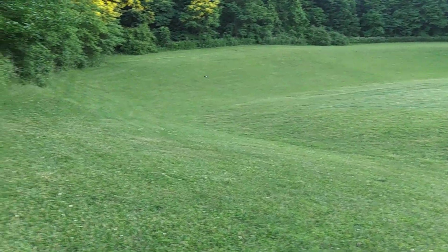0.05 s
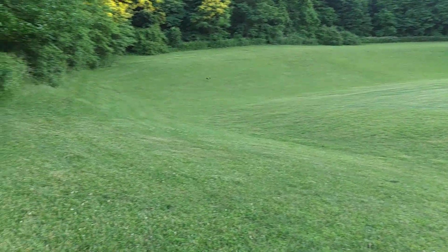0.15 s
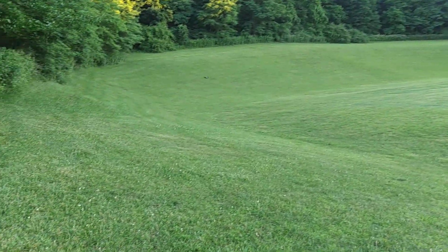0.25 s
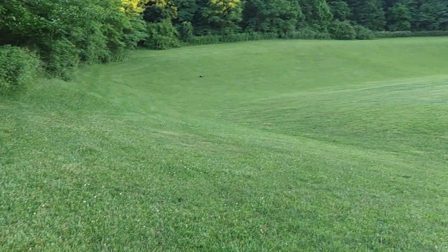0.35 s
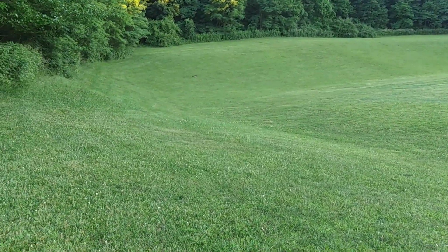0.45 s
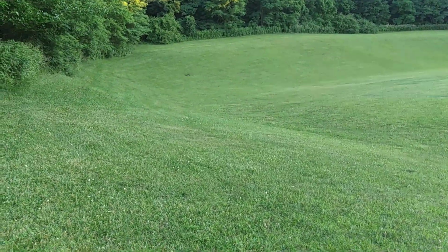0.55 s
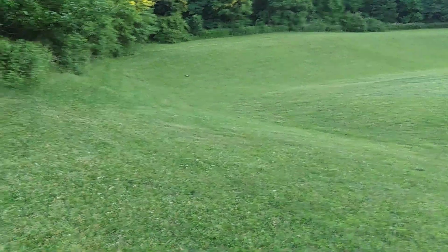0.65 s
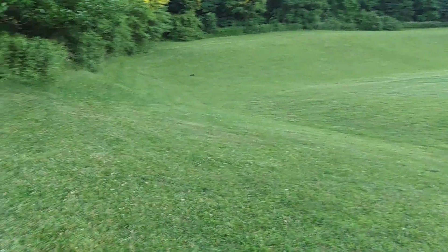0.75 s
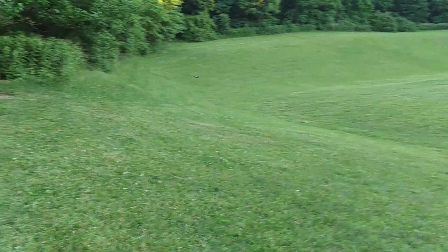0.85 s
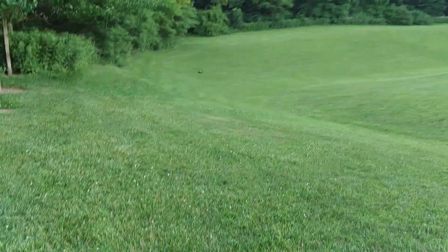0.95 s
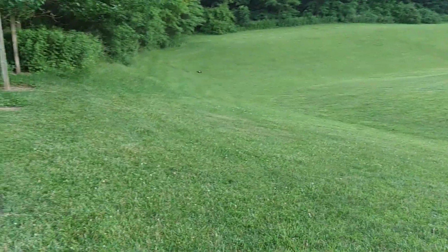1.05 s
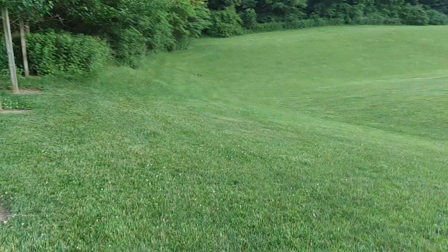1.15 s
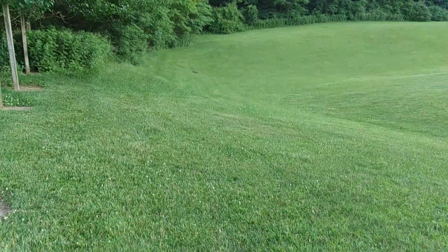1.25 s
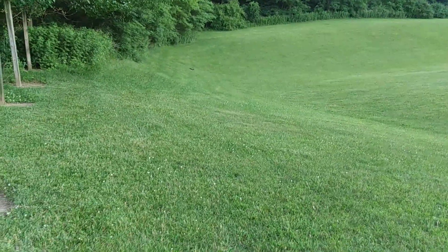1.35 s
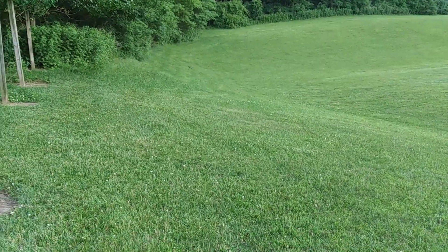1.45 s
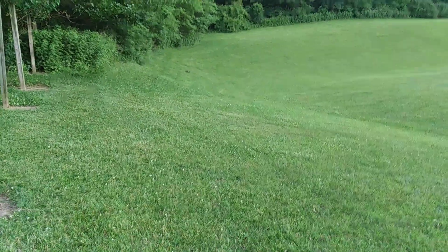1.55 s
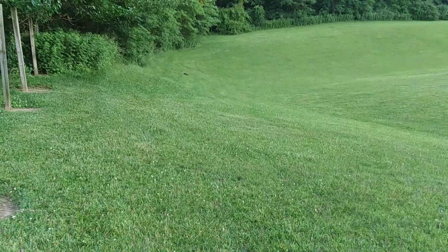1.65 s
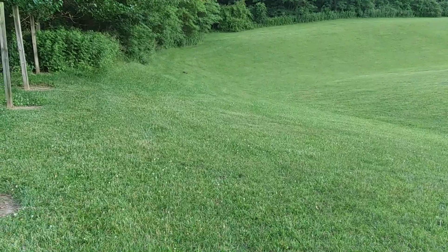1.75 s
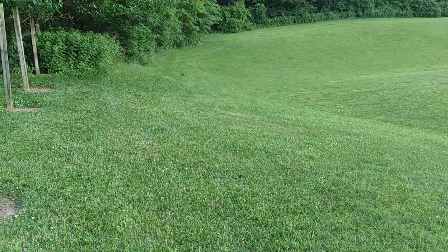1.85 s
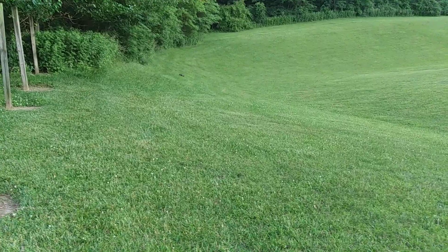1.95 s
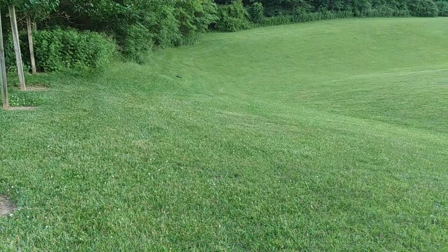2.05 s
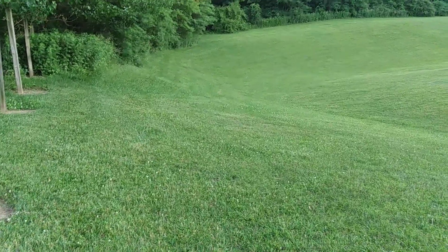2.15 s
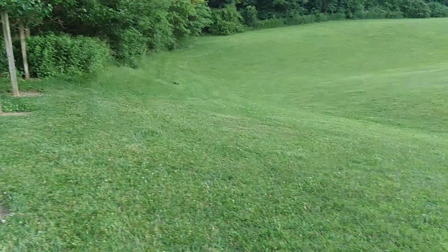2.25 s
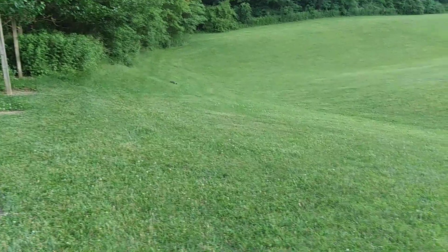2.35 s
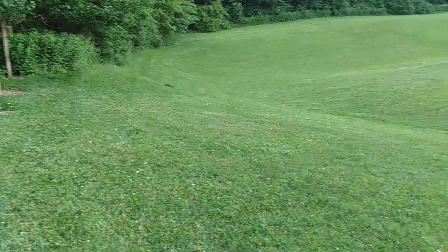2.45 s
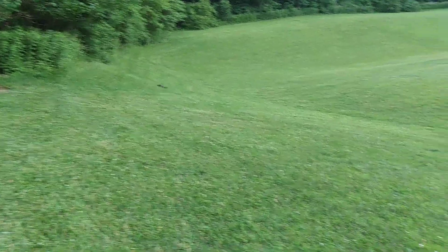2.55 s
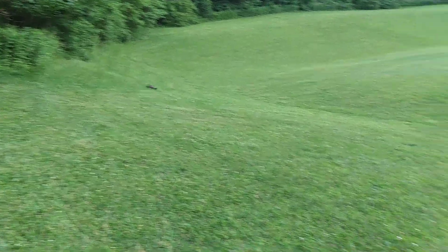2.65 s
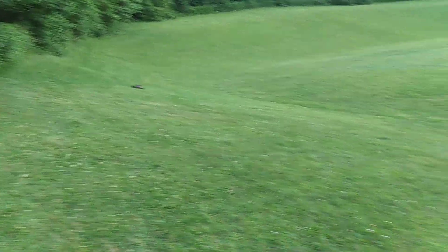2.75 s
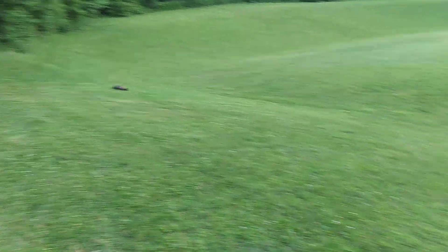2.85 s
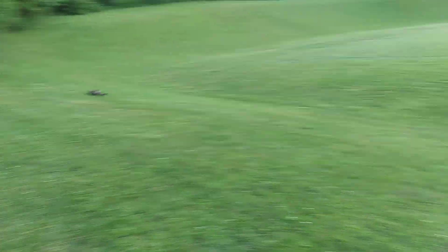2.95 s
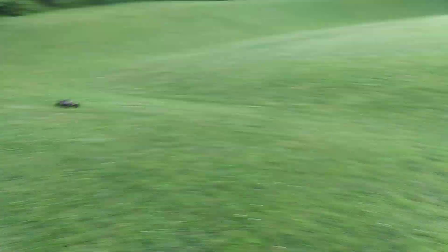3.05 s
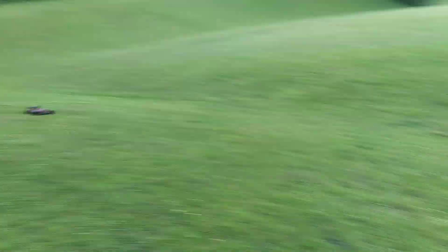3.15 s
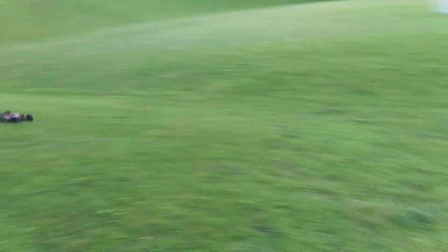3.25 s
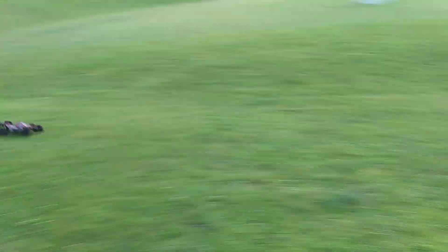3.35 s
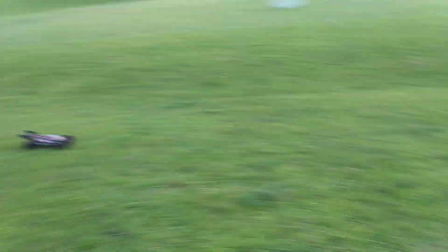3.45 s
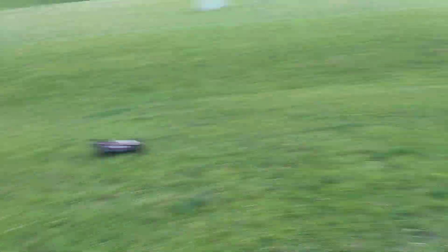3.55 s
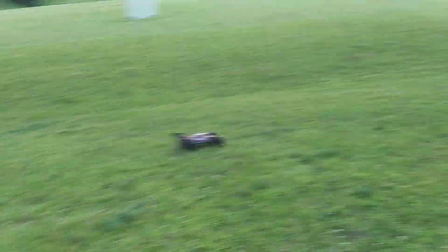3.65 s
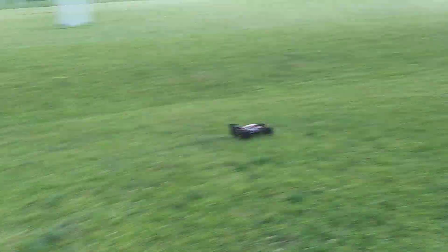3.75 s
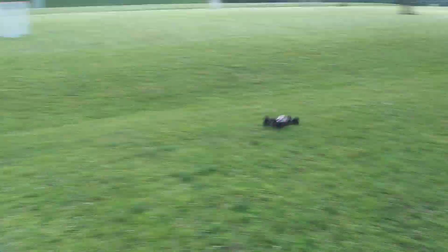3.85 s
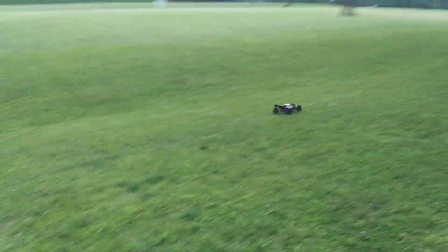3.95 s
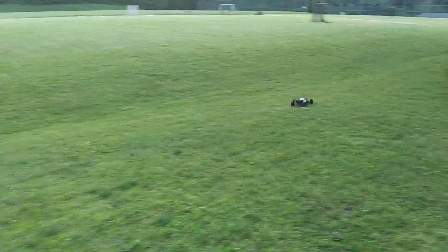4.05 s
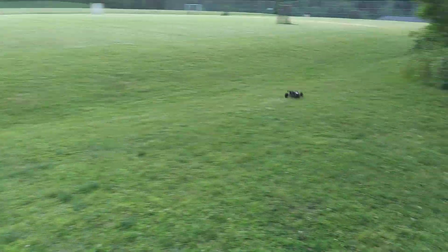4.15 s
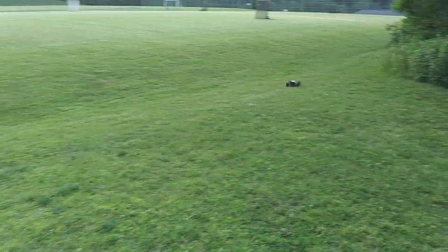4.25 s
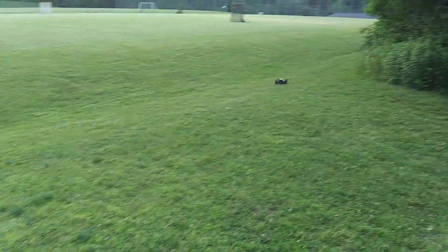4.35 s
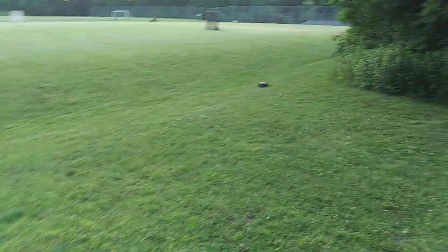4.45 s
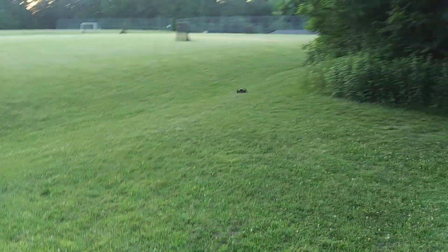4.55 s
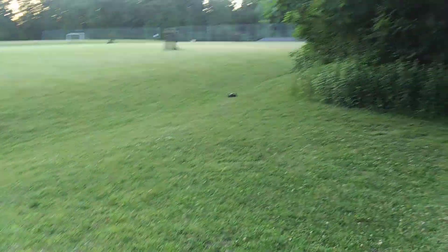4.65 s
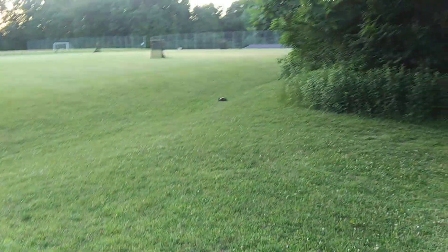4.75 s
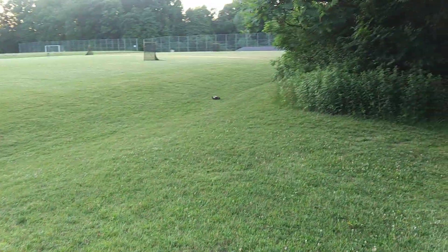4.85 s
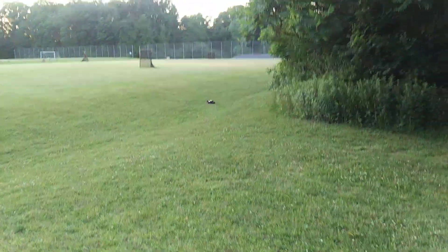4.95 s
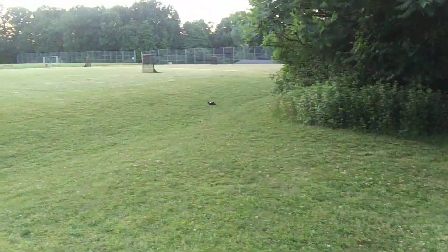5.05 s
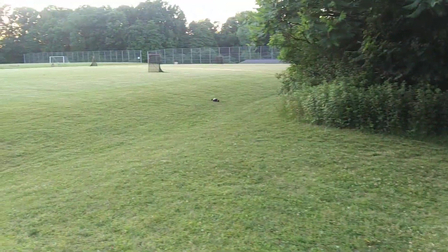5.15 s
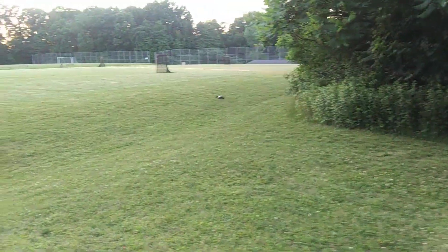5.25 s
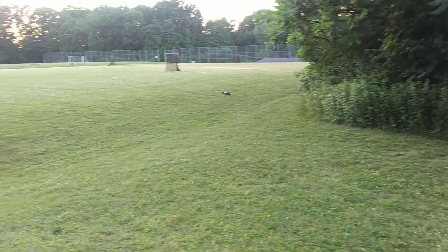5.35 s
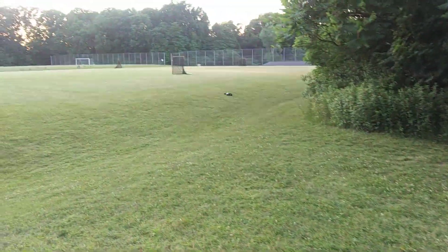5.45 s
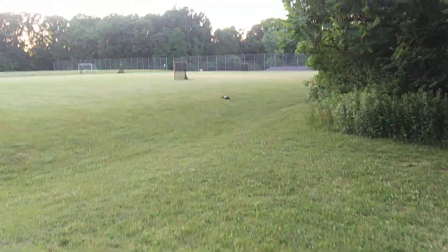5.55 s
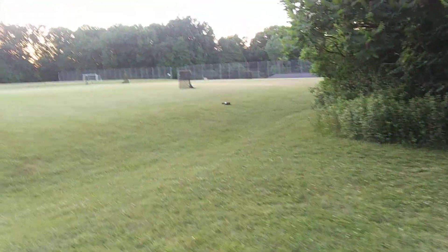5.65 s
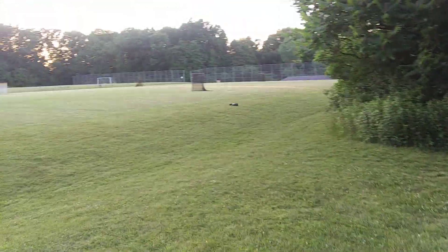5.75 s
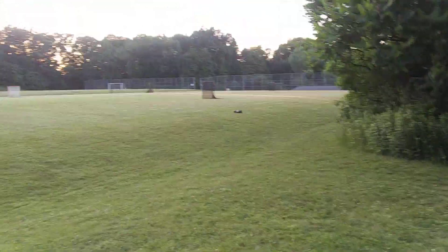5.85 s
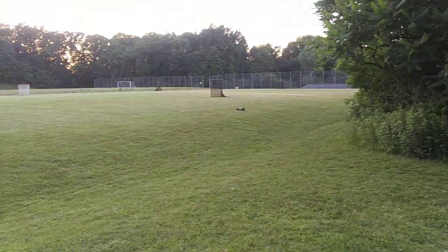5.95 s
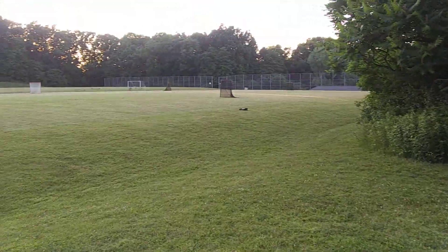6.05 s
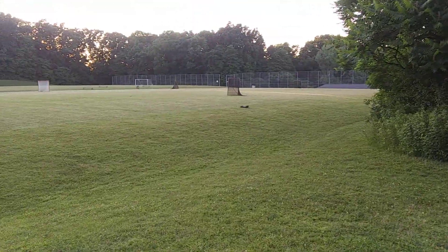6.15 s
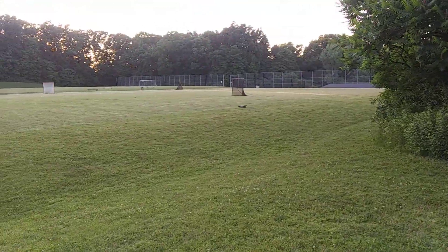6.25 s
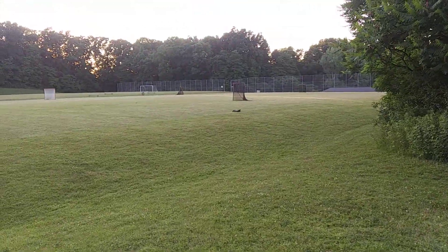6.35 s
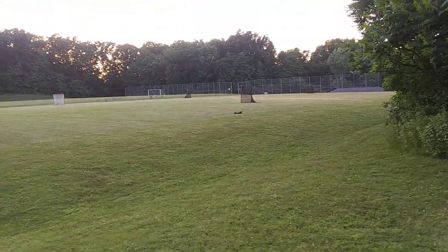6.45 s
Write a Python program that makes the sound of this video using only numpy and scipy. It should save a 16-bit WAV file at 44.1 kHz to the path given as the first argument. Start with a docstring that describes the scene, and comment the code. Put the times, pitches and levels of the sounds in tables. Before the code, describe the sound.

A small electric toy buggy whines and hisses across grass, rushes loudly past the microphone, then coasts away chattering and faint.

```python
"""On a lawn, a small electric buggy races near, passes close, coasts away, then pulls again in the distance.
Its gears whine at multiples of the tooth-mesh rate over a gritty drivetrain hiss of filtered noise.
Tyres roar in the grass as banded noise, and slack joints ring in bursts when the throttle is shut.
Resonances colour the hollow shell, a delayed copy forms the ground reflection, and the speed controller
whistles very high as narrow noise. One microphone feeds both channels."""
import sys
import numpy as np
from scipy import signal
from scipy.io import wavfile
from scipy.ndimage import uniform_filter1d

SR = 44100
rng = np.random.default_rng(int(sys.argv[2]) if len(sys.argv) > 2 else 0)


def int16_out(signal):
    """Quantize to a 16-bit WAV file."""
    q = np.round(np.clip(np.atleast_2d(signal).T, -1, 1) * 32767)
    wavfile.write(sys.argv[1], SR, q.astype(np.int16))


N = 287532

# Spectra, each scaled to unit rms in use: f/Hz, relative density/(dB per Hz)
# still air over the lawn
AIR_SPECTRUM = [(15, -63), (25, -37), (108, -46), (190, -23.5), (734, -2), (2350, -10), (2610, -9),
                (2990, -7), (6050, -14), (10700, -61), (16000, -39)]
AIR_DB = -56.5
# low thrum of wheels and air
THRUM_SPECTRUM = [(59, -62), (100, -28), (225, -4), (296, 0.5), (393, -7), (420, 0.5), (550, -35),
                  (920, -120)]
# tyres in the grass
TYRE_SPECTRUM = [(210, -48), (350, 0), (441, -14.5), (510, 5.5), (900, -3.5), (1060, 2.5), (1300, -4.5),
                 (1460, -8.5), (1700, 6.5), (2210, -43), (3740, -120)]
# top-end sizzle
SIZZLE_SPECTRUM = [(5000, 3), (8500, 2), (9830, -13), (12200, -8), (13400, -21), (15100, -5), (16000, -22)]
# drivetrain hiss under load
PULLING_SPECTRUM = [(820, -8.5), (1400, -6.5), (1500, -33), (1850, -1), (2070, -0.5), (2430, -16),
                    (3120, -1), (3410, -7), (4100, -4), (4770, 15.5), (5640, -27.5), (6070, 5.5),
                    (9500, -29), (12400, -38), (20900, -120)]
# drivetrain hiss with the throttle shut
COASTING_SPECTRUM = [(820, -3), (1400, -0.5), (1660, -13), (2160, -3.5), (2360, -2), (2680, -4.5),
                     (3000, -8.5), (4370, -0.5), (4690, -5.5), (5690, 6), (7840, -13.5), (8770, -9.5),
                     (9500, -38), (12400, -40), (20900, -120)]

# The run, mean levels: t/s, drivetrain level/dB, lower shell mode level/dB, sizzle level/dB
RUN_LEVELS = [(0.0, -46, -60.5, -54.5), (0.31, -41, -54.5, -61), (0.59, -44.5, -62, -76),
              (0.62, -40.5, -59, -54), (1.2, -42, -70, -60), (1.55, -47.5, -70, -58),
              (1.78, -44.5, -65.5, -48), (2.3, -46, -62, -49.5), (2.43, -43.5, -62, -45),
              (2.92, -39, -55.5, -43.5), (3.09, -34, -46, -37), (3.4, -29, -35, -37.5),
              (3.46, -25.5, -34, -61), (3.56, -26, -33, -32), (3.7, -26.5, -31, -37.5),
              (3.8, -32.5, -39.5, -42), (3.96, -35.5, -43.5, -46), (4.3, -38.5, -54, -49),
              (4.76, -48, -58.5, -55), (4.95, -42, -53.5, -60), (5.1, -52, -70, -64),
              (5.43, -52, -65.5, -61.5), (5.77, -69, -70, -62), (5.87, -49, -61, -65),
              (6.52, -52, -59.5, -59.5)]
# Mean thrum: t/s, level/dB
THRUM_LEVELS = [(0, -73), (1.2, -67), (2.4, -70), (3.0, -67.5), (3.5, -56.5), (3.85, -57.5), (4.3, -61.5),
                (4.75, -71.5), (6.52, -87)]
# Mean tyre roar: t/s, level/dB
TYRE_LEVELS = [(0, -59), (1.1, -65), (1.9, -58.5), (2.4, -55), (2.9, -49), (3.2, -44), (3.55, -38.5),
               (3.8, -37.5), (3.95, -47), (4.3, -48.5), (4.8, -56), (5.4, -64), (5.77, -72), (5.87, -60),
               (6.52, -76)]
# Brief level changes while coasting, mostly drops: start t/s, length/s, depth/dB
LEVEL_DIPS = [(3.445, 0.04, 2), (3.874, 0.017, -0.5), (4.008, 0.071, 4), (4.192, 0.057, 3.5),
              (4.38, 0.079, 2), (4.607, 0.014, 3.5), (4.81, 0.055, 2), (4.93, 0.02, 3)]
DIP_EDGE_S = 0.0077
# Throbbing once a shaft turn, with slack in the gears: first beat t/s, last beat t/s, rate/(turns per s)
SHAFT_THROBS = [(.494, .604, 100), (1.149, 1.18, 97), (1.699, 1.804, 96)]
THROB_DB = 5.5

# Upper controller whistle: t/s, f/Hz, mean level/dB
UPPER_WHISTLE = [(3.5, 15750, -64), (3.68, 15620, -58), (3.9, 15220, -60), (4.15, 15070, -64),
                 (4.7, 15000, -71), (5.3, 15120, -73), (6.52, 15300, -84)]
# Lower controller whistle: t/s, f/Hz, mean level/dB
LOWER_WHISTLE = [(3.05, 15100, -58), (3.3, 15170, -45), (3.4, 15000, -54), (3.6, 14700, -54),
                 (3.75, 14350, -64), (4.0, 14200, -69), (4.22, 14200, -74), (4.33, 14200, -67),
                 (4.8, 14330, -74), (5.5, 14530, -87), (5.95, 14720, -82), (6.52, 14750, -88)]
# Thin high ticks, before the high-pass: t/s, level/dB
TREBLE_TICKS = [(0.2114, -57), (0.8094, -49), (0.8894, -51), (1.0194, -51), (1.1644, -52), (1.2112, -40),
                (1.2608, -45), (1.3383, -45)]
# Chassis knocks over bumps, before the band-pass: t/s, level/dB, centre f/Hz
CHASSIS_KNOCKS = [(0.974, -23, 4630), (0.9882, -15.5, 4680), (1.584, -24.5, 1686), (1.677, -32, 4510),
                  (3.083, -19, 3130), (3.945, -21, 4500), (3.9861, -18, 3000), (4.8045, -34, 4400)]
# Driveline chatter while coasting: t/s, relative level/dB, nominal length/s
CHATTER_BURSTS = [(3.7415, -10, 0.023), (3.841, -13.5, 0.021), (3.855, -13.5, 0.023), (3.895, -19, 0.026),
                  (3.941, -17.5, 0.014), (3.986, -14.5, 0.018), (4.017, -22.5, 0.022), (4.088, -19, 0.014),
                  (4.121, -19, 0.023), (4.169, -21, 0.018), (4.274, -24, 0.021), (4.33, -33, 0.036),
                  (4.405, -24.5, 0.042), (4.473, -24, 0.013), (4.505, -20.5, 0.02), (4.635, -27, 0.021),
                  (4.659, -27, 0.065), (4.734, -32.5, 0.042), (4.8, -23.5, 0.022), (4.847, -30, 0.027),
                  (4.908, -24, 0.026), (4.973, -37, 0.02), (4.981, -24, 0.031), (5.056, -31, 0.046),
                  (5.145, -34, 0.031), (5.177, -43, 0.02), (5.412, -33, 0.018), (5.482, -36, 0.013),
                  (5.502, -31.5, 0.013), (5.551, -34.5, 0.016), (5.574, -34, 0.016), (5.601, -33.5, 0.015),
                  (5.649, -34.5, 0.022), (5.667, -34.5, 0.03), (5.708, -34.5, 0.013), (5.732, -36, 0.022),
                  (5.755, -40, 0.028), (5.779, -37.5, 0.031), (5.808, -34, 0.023), (5.833, -34, 0.02)]
CHATTER_TOP_HZ = 11000
# Metal driveline modes: f/Hz, width/Hz, relative level/dB
JOINT_MODES = [(3260, 320, -3.5), (4800, 710, 4), (5170, 210, -2), (5810, 180, 0), (4000, 200, -7.5),
               (6960, 530, -18), (8510, 140, -9)]
# Joint ringing under load, stronger close by: t/s, amplitude share
JOINT_SHARE_PULLING = [(0, 0.34), (2.2, 0.31), (2.9, 0.59), (3.1, 0.75)]

# Lower modes of the hollow body shell: f/Hz, width/Hz, relative level/dB
SHELL_LOW_MODES = [(632.6, 50, -3.5), (751, 52, 1), (873, 39, -2.5)]
SHELL_HIGH_HZ, SHELL_HIGH_WIDTH_HZ = 1274, 102   # upper mode before the pitch shift
# Pitch shift of the passing shell: t/s, frequency ratio
SHELL_PITCH_SHIFT = [(0, 1.03), (3.4, 1.035), (3.85, .95), (6.52, .95)]
# Narrow stretches cut from the buggy's sound, steady in frequency: f/Hz, width/Hz, depth/dB
STEADY_NOTCHES = [(1062, 170, 3), (1530, 270, 3), (2363, 103, 7.5), (2900, 120, 5.5), (3400, 116, 5),
                  (4744, 103, 4.5), (5190, 120, 1.5), (5900, 93, 4), (6340, 165, 6), (7930, 220, 0.5),
                  (8550, 410, 3)]
# Reflection from the sloping ground: t/s, extra path time/ms, strength 0-1
GROUND_REFLECTION = [(0, .96, .6), (.4, .95, .6), (.55, .8, .5), (.68, .62, .6), (1.0, .44, .5),
                     (1.4, .25, .2), (3.0, .3, .1), (4.0, .65, .3), (4.85, .88, .25), (4.95, .22, .3),
                     (5.2, .33, .5), (5.45, .42, .4), (5.9, .57, .45), (6.2, .645, .4), (6.52, .71, .3)]
# Bands standing out of the hiss:
# start t/s, end t/s, start f/Hz, end f/Hz, width/Hz, mean level re drivetrain/dB
HISS_BANDS = [(0.01, 0.51, 2750, 2840, 130, -15.5), (0.2, 0.36, 9100, 6300, 110, -14),
              (0.66, 0.86, 5100, 5050, 110, -12), (0.62, 1.65, 9600, 9800, 220, -26.5),
              (0.98, 1.13, 5600, 5850, 98, -5), (1.8, 1.8, 5550, 5500, 108, -8),
              (1.3, 1.85, 7250, 7000, 180, -9.5), (2.66, 2.7, 6100, 5750, 137, -8),
              (3.02, 3.3, 5800, 5300, 120, -9), (3.03, 3.42, 5250, 5400, 168, -5),
              (2.3, 3.2, 3100, 4600, 110, -6.5), (3.52, 3.76, 5500, 5450, 156, -6.5),
              (3.52, 3.8, 4800, 4550, 110, -11), (3.553, 3.66, 2830, 2850, 150, -10.5),
              (3.52, 3.75, 9350, 9250, 220, -23), (4.27, 4.85, 8900, 8950, 150, -18),
              (4.08, 4.36, 4800, 4800, 89, -14.5), (4.7, 5.0, 4420, 4480, 110, -6.5),
              (4.5, 4.95, 5050, 5500, 90, -12), (4.62, 5.02, 5800, 5780, 83, -8.5),
              (4.02, 4.3, 6650, 6700, 110, -16), (5.08, 5.3, 5850, 5900, 130, -17),
              (5.2, 5.5, 5000, 4750, 200, -14), (5.33, 5.8, 8450, 8500, 160, -11.5),
              (5.88, 6.52, 2600, 2700, 150, -15.5), (5.85, 6.36, 8400, 7000, 130, -18),
              (5.9, 6.52, 8400, 8600, 200, -17), (5.92, 6.52, 6600, 5600, 330, -8.5),
              (5.83, 6.1, 5300, 5800, 240, -17)]
BAND_FLICKER_DB = 3

# Gear whine before the nodding: t/s, tooth-mesh f/Hz
MESH_RATE = [(0.0, 2078), (.3, 2082), (.42, 2024), (.52, 2146), (.63, 2054), (.68, 1947), (.76, 2043),
             (.79, 1883), (.87, 1920), (.93, 1968), (.97, 1950), (1.0, 1880), (1.05, 1848), (1.075, 1917),
             (1.13, 2093), (1.2, 2065), (1.23, 1827), (1.66, 1853), (1.71, 2050), (1.81, 2078),
             (1.87, 1912), (1.93, 2040), (2.04, 1990), (2.13, 2080), (2.19, 2070), (2.225, 1880),
             (2.29, 1900), (2.33, 2070), (2.39, 2008), (2.44, 2040), (2.56, 2072), (2.605, 1990),
             (2.63, 1879), (2.68, 2000), (2.72, 2127), (2.8, 2080), (2.84, 1915), (2.88, 1970),
             (2.93, 2058), (3.05, 1948), (3.14, 2104), (3.23, 1985), (3.29, 1979), (3.4, 2065),
             (3.46, 2080), (3.48, 1863), (3.66, 1830), (3.75, 1740), (3.8, 1598), (3.85, 1614),
             (3.95, 1570)]
# Levels re drivetrain: t/s, 1st mesh order level/dB, 2nd level/dB, 3rd level/dB, upper shell mode level/dB
ORDER_LEVELS = [(0.0, -9, 3, -2, -7.5), (.15, -6, -1.5, -2, -14.5), (.32, -11.5, -3, -2, -8),
                (.42, -10, -9, -5, -3.5), (.52, -15, -3, -11, -16), (.58, -16, -4, -23, -16),
                (.62, -10, 2, -10, -9.5), (.65, -9, -7, -6, -9), (.72, -11, -9, -5, -12),
                (.86, -10, -2.5, 0.5, -10), (.96, -7.5, -42, -11, -15), (1.06, -9, 2, -6, -9),
                (1.12, -2.5, -10, -5, -19), (1.145, -26, -2, -24, -26), (1.185, -30, -10, -27, -26),
                (1.205, -8, 5, -24, -26), (1.24, -18, 4.5, -28, -22), (1.4, -32, -3.5, -8.5, -23),
                (1.66, -28, -1.5, 0, -14), (1.73, -44, 3.5, -5, -35), (1.85, -28, -6.5, -8, -24),
                (2.3, -10, -5.5, -7, -20), (2.9, -53, -5.5, -8, -31), (3.05, -16, -5, -1.5, -13),
                (3.15, -13.5, -3, -6, -16.5), (3.3, -10, -8, -6, -6), (3.38, -7, 1.5, 2.5, -10.5),
                (3.44, -9, -3, -4, -12), (3.5, -13, -6.5, -31, -9), (3.57, -9, -10, -1.5, -10),
                (3.63, -8.5, -3, -20, -7), (3.69, -4, -28, -14, -11), (3.75, -6.5, -22, -16, -10),
                (3.78, -17, -30, -27, -7.5), (3.86, -4.5, -30, -18, -9), (3.95, -24, -24, -20, -13),
                (4.3, -22, -20, -12, -25)]
# Break-up of the whine as wheels skip over the turf: t/s, scatter 0-1
WHEEL_SKIP = [(0, .05), (.42, .1), (.5, .9), (.6, .85), (.64, .6), (.78, .3), (1.1, .3), (1.14, .9),
              (1.22, .2), (1.35, .35), (1.66, .4), (1.72, .7), (1.9, .4), (2.2, .38), (2.9, .35),
              (3.0, .45), (3.15, .3), (3.4, .3), (3.5, .4), (3.66, .25), (3.75, .4), (3.95, .8)]
# Slower strand of the second order, as of the other axle: t/s, mean f/Hz, mean level re drivetrain/dB
SLOWER_STRAND = [(1.68, 3667, -12), (1.85, 3710, -11), (2.0, 3778, -19), (2.27, 3770, -8),
                 (2.45, 3760, -18), (2.6, 3768, -19), (2.75, 3780, -14), (2.87, 3805, -12),
                 (3.1, 3830, -13)]
# Ends of the low shaft hum: t/s
SHAFT_HUM_SPAN = [(1.72,), (3.47,)]
MESH_PER_HUM, HUM_DB = 4.1, -17.5   # frequency ratio; level re drivetrain
WHINE_FLICKER_DB = 1.5
SLEW_LOSS_DB = 1.5   # whine loss while the speed jumps: dB per 100 % a second
# The chassis rocks at first and the whine sags with each nod
PITCHING_HZ, PITCHING_TOP_S, PITCHING_DEPTH, PITCHING_END_S = 7.4, .005, .055, .6

THROTTLE_OFF_S, THROTTLE_FADE_S = 3.49, 0.096
SHAKE_PULLING_DB, SHAKE_COASTING_DB, THRUM_GUST_DB = 1.3, 1.8, 2.5
THROTTLE_ON_S, SHAKE_ON_AGAIN_DB = 5.85, .6   # under throttle again the hiss runs smoother
CUTOFF_HZ = 15760


def from_db(db):
    """Logarithmic level: decibels to amplitude gain."""
    return 10 ** (np.asarray(db) / 20)


def rms_one(x):
    """Normalisation of mean power: scale to unit rms."""
    return x / np.sqrt(np.mean(x ** 2) + 1e-20)


def in_time(rows):
    """Linear interpolation: each table column after the time, one value per sample."""
    s, *columns = np.transpose(rows)
    return [np.interp(np.arange(N) / SR, s, column) for column in columns]


def sounding(rows, fade_s=0.034):
    """Gating envelope: 1 while the table lasts, with linear fades beyond its ends."""
    t = np.arange(N) / SR
    inside_s = np.minimum(t - rows[0][0], rows[-1][0] - t)
    return np.clip(1 + inside_s / fade_s, 0, 1)


def drift(rate):
    """Low-pass random process: noise at every 20th sample through a double pole at rate/Hz; spread 1."""
    r = np.exp(-40 * np.pi * rate / SR)
    noise = rng.standard_normal(N // 20 + 3002)
    slow = signal.lfilter([1], [1, -2 * r, r * r], noise)[3000:]   # skip the settling
    return np.interp(np.arange(N) / 20, np.arange(len(slow)), rms_one(slow))


def coloured(spectrum, patchy_db, rate):
    """Band synthesis: quarter-octave noises, each flickering on its own; rms 1."""
    hz, level_db = np.transpose(spectrum)
    edges = hz[0] * 2 ** np.arange(0, np.log2(hz[-1] / hz[0]) + .2, .25)
    white = rng.standard_normal((2, N))      # neighbouring bands get unrelated noise
    out = 0
    for k, (low, high) in enumerate(zip(edges, np.minimum(edges[1:], .45 * SR))):
        band_pass = signal.butter(2, [low, high], "band", fs=SR, output="sos")
        band = signal.sosfilt(band_pass, white[k % 2])
        centre_db = np.interp(np.log(low * high) / 2, np.log(hz), level_db)
        out = out + band * from_db(centre_db + patchy_db * drift(rate))
    return rms_one(out)


def rough_tone(hz, clean, width_hz):
    """Random modulation of a carrier: steady core of power share `clean` in narrow noise; rms near 1."""
    phase = 2 * np.pi * np.cumsum(hz) / SR
    share = np.clip(clean, 0, 1)
    skirt = drift(width_hz) * np.cos(phase) + drift(width_hz) * np.sin(phase)
    return np.sqrt(2 * share) * np.sin(phase) + np.sqrt(1 - share) * skirt


def resonant_noise(hz, width_hz):
    """Resonance: white noise through a two-pole filter; rms 1."""
    r = np.exp(-np.pi * width_hz / SR)
    poles = [1, -2 * r * np.cos(2 * np.pi * hz / SR), r * r]
    return rms_one(signal.lfilter([1, 0, -1], poles, rng.standard_normal(N)))


def dips():
    """Amplitude modulation: level change in dB over time, as soft-edged notches."""
    return -sum(depth_db * sounding([(s,), (s + length_s,)], DIP_EDGE_S)
                for s, length_s, depth_db in LEVEL_DIPS)


def throb():
    """Periodic modulation: level swing in dB, beating at the shaft rate in each spell."""
    t = np.arange(N) / SR
    return sum(THROB_DB * sounding([(first,), (last,)], .02) * np.cos(2 * np.pi * rate * (t - first))
               for first, last, rate in SHAFT_THROBS)


def still_air():
    """Broadband ambient noise: a faint, patchy bed from the air over the lawn."""
    return from_db(AIR_DB) * coloured(AIR_SPECTRUM, patchy_db=2.5, rate=10.0)


def low_thrum():
    """Low-frequency random noise: wheels and air together, with slow swells of level."""
    level_db = in_time(THRUM_LEVELS)[0] + THRUM_GUST_DB * drift(6)
    return from_db(level_db) * coloured(THRUM_SPECTRUM, patchy_db=2.5, rate=6)


def controller():
    """Electronic switching tones: two faint, flickering bands of narrow noise near the top of hearing."""
    out = 0
    for rows in (UPPER_WHISTLE, LOWER_WHISTLE):
        hz, level_db = in_time(rows)
        flicker = from_db(level_db + 5 * drift(25))
        out = out + sounding(rows) * flicker * rough_tone(hz, clean=0, width_hz=110)
    return out


def ticks():
    """Impulsive noise: treble bursts decaying within milliseconds."""
    out, t = np.zeros(N), np.arange(int(.008 * SR)) / SR
    for (s, level_db), noise in zip(TREBLE_TICKS, rng.standard_normal((len(TREBLE_TICKS), len(t)))):
        at = int(s * SR)
        out[at:at + len(t)] += from_db(level_db) * noise * np.exp(-t / .0012)
    return signal.sosfilt(signal.butter(2, 8000, "high", fs=SR, output="sos"), out + 1e-18)


def top_sizzle(sizzle_db, shake):
    """Amplitude-modulated treble noise: the sizzle follows the shaking over bumps."""
    return from_db(sizzle_db + 0.93 * shake) * coloured(SIZZLE_SPECTRUM, patchy_db=0.5, rate=11.0)


def tyre_roar(shake):
    """Rolling noise: tyres in grass give banded noise whose level shakes over bumps."""
    level_db = in_time(TYRE_LEVELS)[0] + dips() + shake
    return from_db(level_db) * coloured(TYRE_SPECTRUM, patchy_db=1.0, rate=10)


def knocks():
    """Impact excitation: each bump is a short crack ringing briefly in the plastic shell."""
    out, t = np.zeros(N), np.arange(int(0.058 * SR)) / SR
    noises = rng.standard_normal((len(CHASSIS_KNOCKS), len(t)))
    for (s, level_db, hz), noise in zip(CHASSIS_KNOCKS, noises):
        crack = noise * np.exp(-t / 0.0015)
        ring = np.sin(2 * np.pi * hz * t) * np.exp(-t / .0018)
        at = int(s * SR)
        out[at:at + len(t)] += from_db(level_db) * (0.96 * crack + 0.5 * ring)
    return signal.sosfilt(signal.butter(4, [1100, 6500], "band", fs=SR, output="sos"), out + 1e-18)


def joints():
    """Modal superposition: the driveline's modes, each excited unevenly; rms 1."""
    return rms_one(sum(from_db(level_db + 2.5 * drift(15)) * resonant_noise(hz, width_hz)
                       for hz, width_hz, level_db in JOINT_MODES))


def chatter():
    """Impacts across a clearance: slack joints slap in soft-edged bursts that ring the driveline's modes."""
    swell = np.zeros(N)
    for s, level_db, length_s in CHATTER_BURSTS:
        burst = np.hanning(int(max(length_s, .015) * SR))
        at = int((s - .003) * SR)   # the swell begins just ahead of its tabled time
        swell[at:at + len(burst)] += from_db(level_db - 13.5) * burst
    slaps = swell * (.75 * joints() + .65 * coloured(COASTING_SPECTRUM, patchy_db=1, rate=8))
    return signal.sosfilt(signal.butter(2, CHATTER_TOP_HZ, fs=SR, output="sos"), slaps)


def shell(drive_db, roll_db):
    """Forced resonance with pitch shift: wheels boom in the lower modes, gears shake the upper one."""
    shift = in_time(SHELL_PITCH_SHIFT)[0]
    low = sum(from_db(level_db) * rough_tone(hz * shift, clean=0, width_hz=width_hz)
              for hz, width_hz, level_db in SHELL_LOW_MODES)
    high = rough_tone(SHELL_HIGH_HZ * shift, clean=0, width_hz=SHELL_HIGH_WIDTH_HZ)
    high_db = drive_db + in_time(ORDER_LEVELS)[3]
    return from_db(roll_db) * rms_one(low) + from_db(high_db) * high


def steady_notches(x):
    """Notch filtering: one narrow, steady cut in the buggy's sound for each row."""
    for hz, width_hz, depth_db in STEADY_NOTCHES:
        w, gain = 2 * np.pi * hz / SR, from_db(-depth_db / 2)
        damp = np.pi * width_hz / SR
        zeros = [1 + damp * gain, -2 * np.cos(w), 1 - damp * gain]
        poles = [1 + damp / gain, -2 * np.cos(w), 1 - damp / gain]
        x = signal.lfilter(zeros, poles, x)
    return x


def ground_bounce(x):
    """Comb interference: a late, duller copy from the turf sweeps notches as the path changes."""
    delay_ms, strength = in_time(GROUND_REFLECTION)
    share = np.clip(strength, 0, .8)
    dull = np.convolve(x, np.array([.25, .5, .25]), "same")
    late = np.interp(np.arange(N) - delay_ms * SR / 1000, np.arange(N), dull)
    return (x + share * late) / np.sqrt(1 + share ** 2)


def bands(drive_db):
    """Narrow-band noise: flickering bands of hiss, gliding between their end frequencies."""
    out = 0
    for start_s, end_s, start_hz, end_hz, width_hz, level_db in HISS_BANDS:
        rows = [(start_s, start_hz), (end_s, end_hz)]
        gain = from_db(drive_db + level_db + BAND_FLICKER_DB * drift(6.5))
        tone = rough_tone(in_time(rows)[0], clean=0, width_hz=width_hz)
        out = out + sounding(rows, .04) * gain * tone
    return out


def drivetrain(drive_db):
    """Contact noise: teeth hiss; joints ring through more as the buggy nears, and as strongly in coasting."""
    t = np.arange(N) / SR
    off = 1 / (1 + np.exp((THROTTLE_OFF_S - t) / THROTTLE_FADE_S))
    pulling = coloured(PULLING_SPECTRUM, patchy_db=.8, rate=8)
    pulling = pulling + in_time(JOINT_SHARE_PULLING)[0] * joints()
    coasting = .8 * coloured(COASTING_SPECTRUM, patchy_db=1.2, rate=8) + .6 * joints()
    hiss = np.sqrt(1 - off) * pulling + np.sqrt(off) * coasting   # equal-power crossfade
    shake_db = SHAKE_PULLING_DB + (SHAKE_COASTING_DB - SHAKE_PULLING_DB) * off
    shake_db = np.where(t > THROTTLE_ON_S, SHAKE_ON_AGAIN_DB, shake_db)
    return from_db(drive_db + shake_db * drift(137)) * hiss


def mesh_speed():
    """Frequency modulation: the tooth-mesh rate sags briefly with each nod of the rocking chassis."""
    t = np.arange(N) / SR
    rocking = PITCHING_DEPTH * np.clip(1 - (t / PITCHING_END_S) ** 2, 0, 1)
    nod = np.sin(np.pi * PITCHING_HZ * (t - PITCHING_TOP_S)) ** 4
    return in_time(MESH_RATE)[0] * (1 - rocking * nod)


def mesh_order(hz, clean, width_hz, fray):
    """Loss of coherence: a grainy line splits into wandering strands when wheels skip, more with fray."""
    skip = in_time(WHEEL_SKIP)[0] ** (1 / fray)
    strands = sum(rough_tone(hz * (1 + .018 * drift(10)), clean=0, width_hz=width_hz) for _ in range(3))
    line = from_db(1.5 * drift(35)) * rough_tone(hz, clean, width_hz)
    return np.sqrt(1 - skip) * line + np.sqrt(skip / 3) * strands


def gears(drive_db):
    """Harmonics of tooth mesh: uneven teeth smear higher orders more; a thin shaft hum lies far below."""
    mesh_hz = mesh_speed()
    slew = np.abs(np.gradient(np.log(in_time(MESH_RATE)[0]))) * SR   # relative speed change per second
    loss_db = SLEW_LOSS_DB * uniform_filter1d(slew, size=400)
    first_db, second_db, third_db = (drive_db - loss_db + db + WHINE_FLICKER_DB * drift(12)
                                     for db in in_time(ORDER_LEVELS)[:3])
    first = from_db(first_db) * mesh_order(mesh_hz, clean=.7, width_hz=50, fray=.7)
    second = from_db(second_db) * mesh_order(2 * mesh_hz, clean=.4, width_hz=90, fray=1)
    third = from_db(third_db) * mesh_order(3 * mesh_hz, clean=.25, width_hz=110, fray=1.3)
    whine = sounding(MESH_RATE) * (first + second + third)

    hum = from_db(drive_db + HUM_DB) * rough_tone(mesh_hz / MESH_PER_HUM, clean=.92, width_hz=10)
    slow_hz, slow_db = in_time(SLOWER_STRAND)
    slow_gain = from_db(drive_db + slow_db + 3 * drift(15))
    slow = slow_gain * rough_tone(slow_hz * (1 + .008 * drift(8)), clean=0, width_hz=70)
    return whine + sounding(SHAFT_HUM_SPAN) * hum + sounding(SLOWER_STRAND) * slow


def scene():
    """Superposition: all sources add at one microphone, copied to both channels."""
    drive_db, roll_db, sizzle_db = in_time(RUN_LEVELS) + dips()
    drive_db = drive_db + throb()
    shake = drift(24.0)      # bumps shake tyres and sizzle together
    background = still_air() + low_thrum() + controller() + ticks()
    running = ground_bounce(drivetrain(drive_db) + chatter()) + top_sizzle(sizzle_db, shake)
    body = steady_notches(running + shell(drive_db, roll_db) + tyre_roar(shake) + knocks())
    mono = background + body + bands(drive_db) + gears(drive_db)
    return np.array([mono, mono])


def record(dry):
    """Band limitation: the microphone drops deep bass, adds a faint dark hiss and cuts the top steeply."""
    thinned = signal.sosfilt(signal.butter(4, 150, "high", fs=SR, output="sos"), dry)
    hiss = from_db(-70.0) * signal.lfilter([.02], [1, -.98], rng.standard_normal(N))
    top_cut = signal.ellip(14, .5, 75, CUTOFF_HZ, fs=SR, output="sos")
    return signal.sosfilt(top_cut, thinned + hiss)


dry = scene()
out = record(dry)
int16_out(out)
```